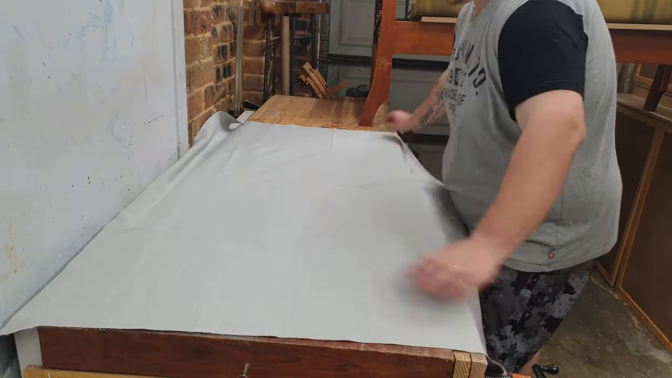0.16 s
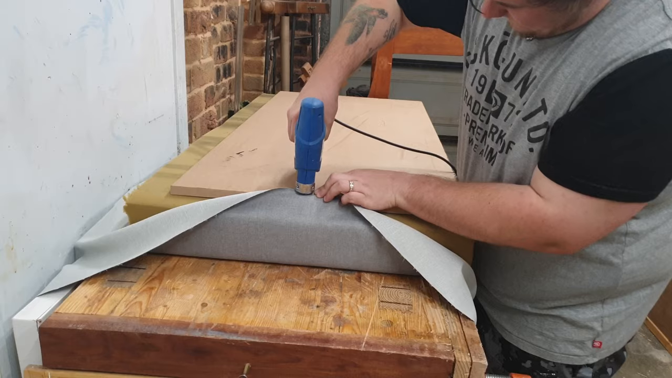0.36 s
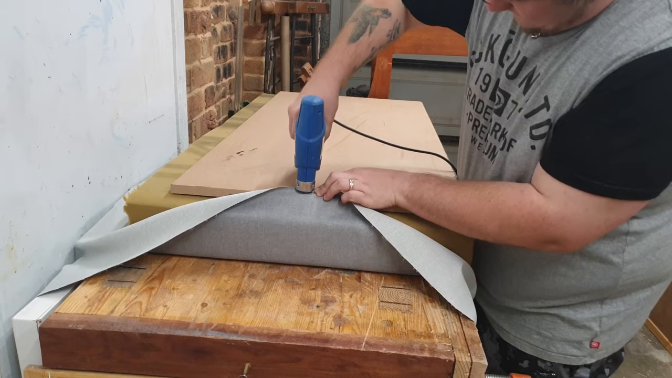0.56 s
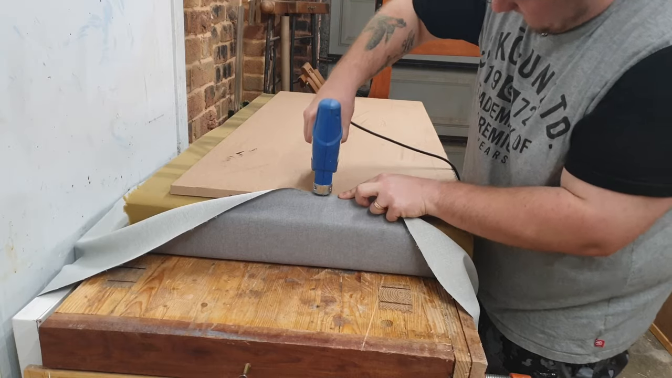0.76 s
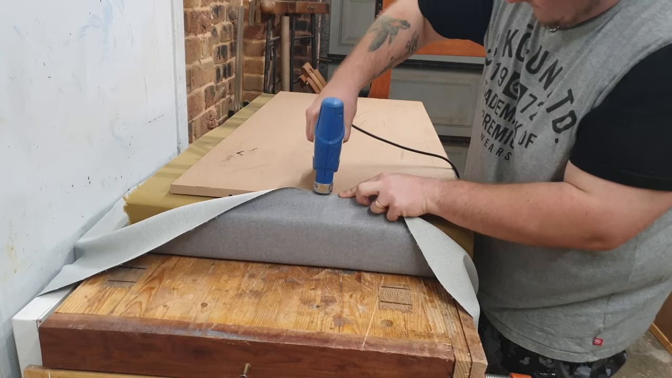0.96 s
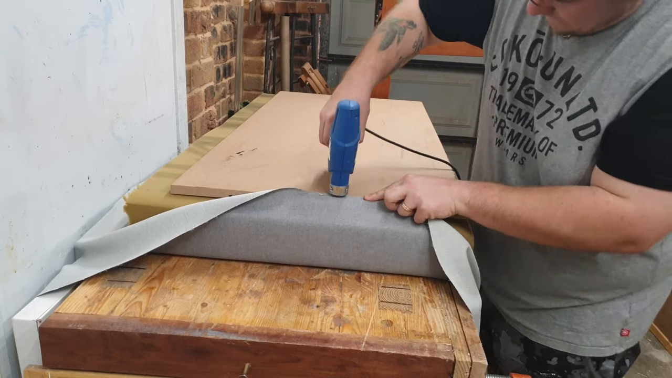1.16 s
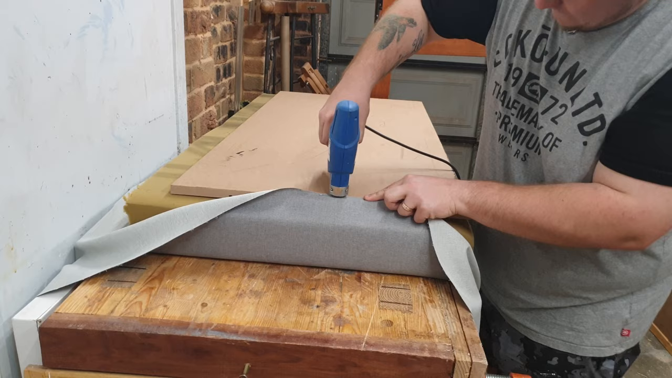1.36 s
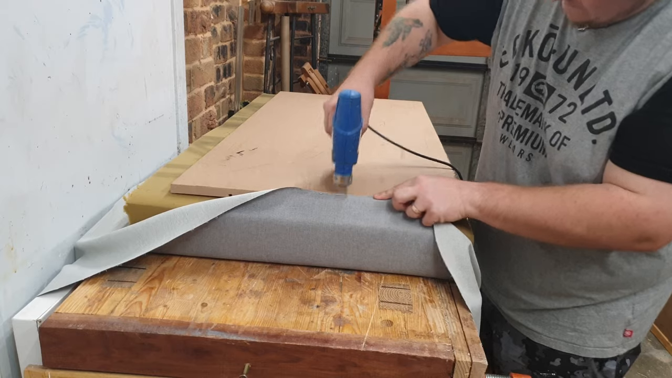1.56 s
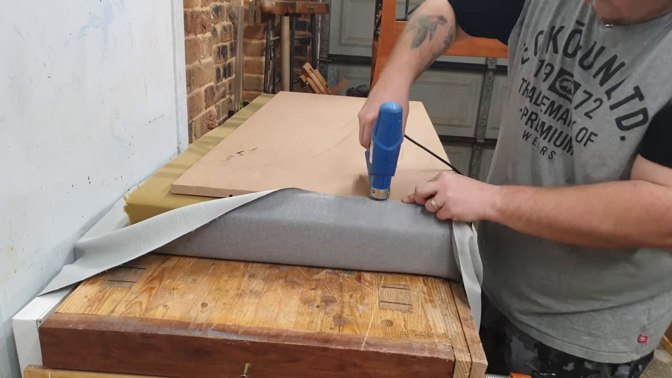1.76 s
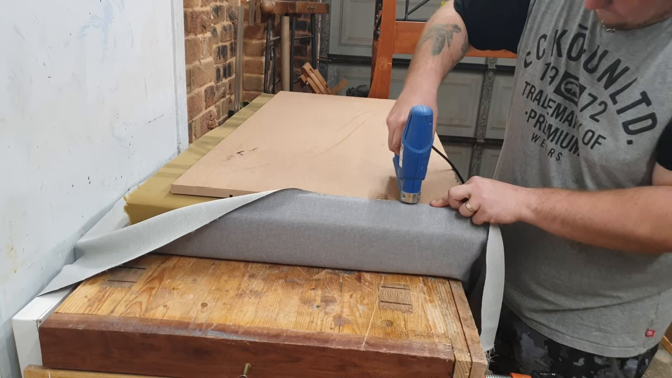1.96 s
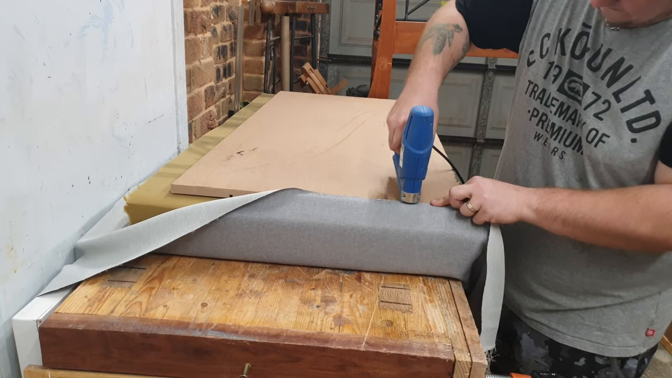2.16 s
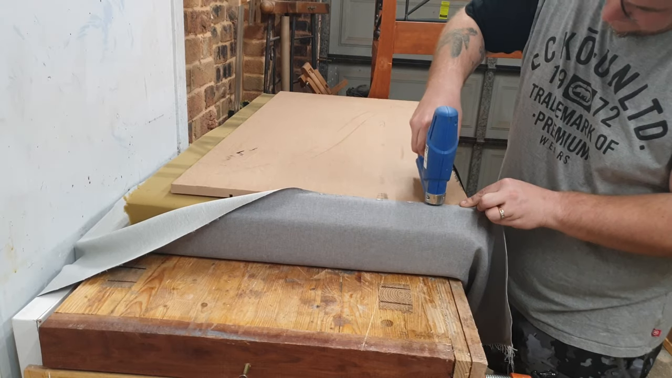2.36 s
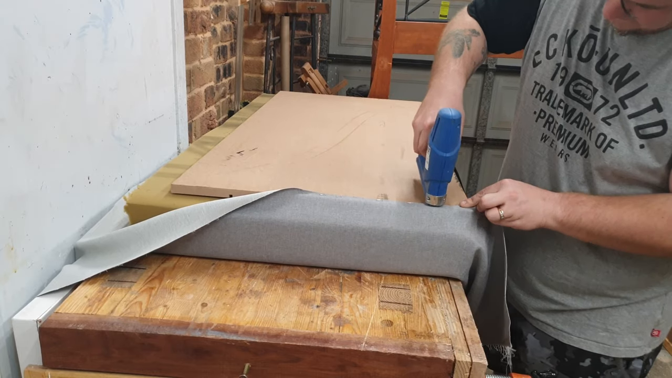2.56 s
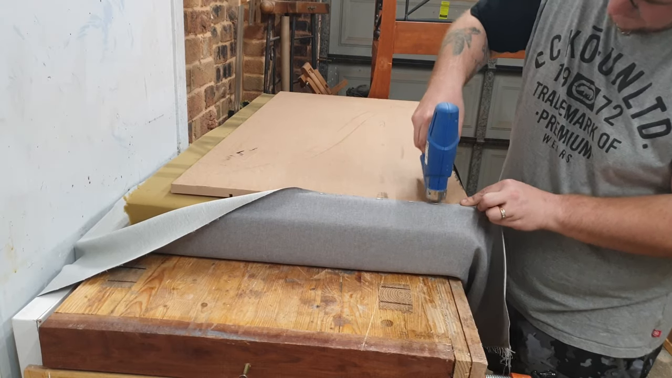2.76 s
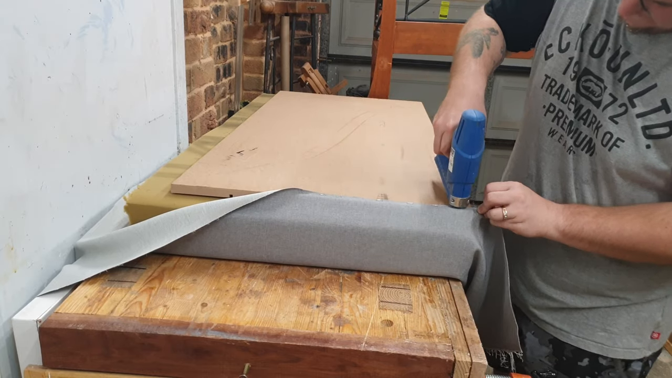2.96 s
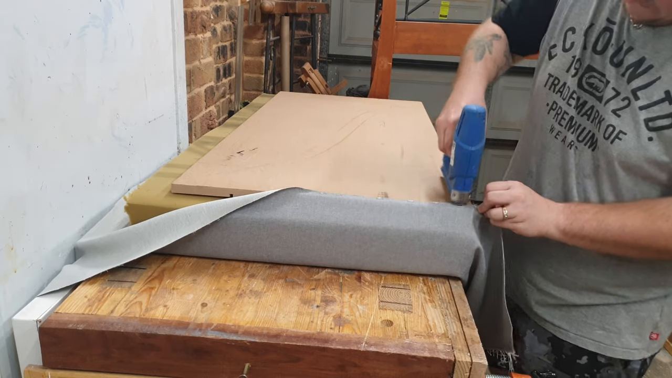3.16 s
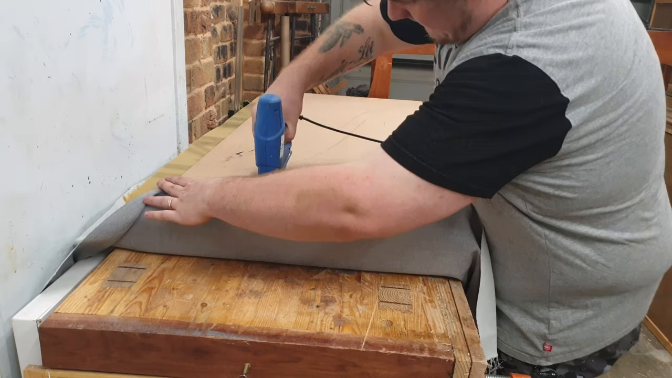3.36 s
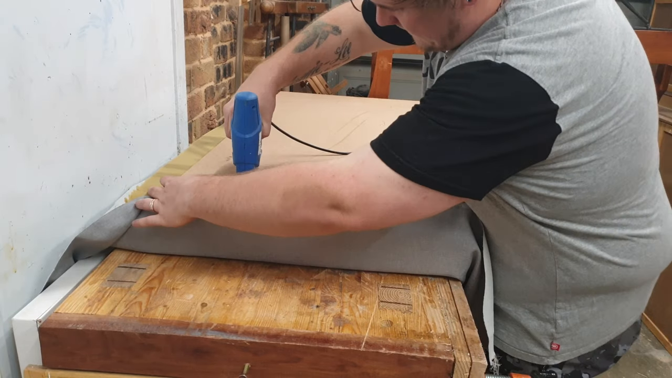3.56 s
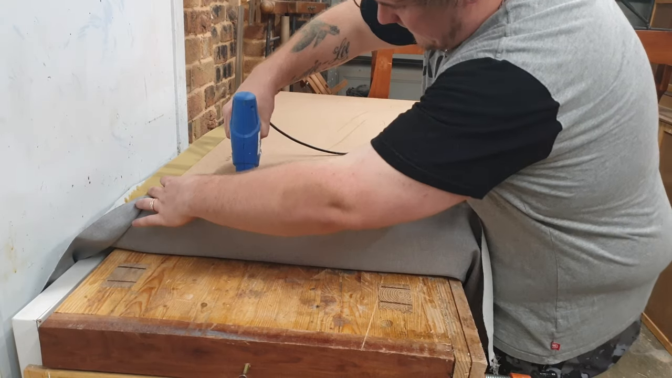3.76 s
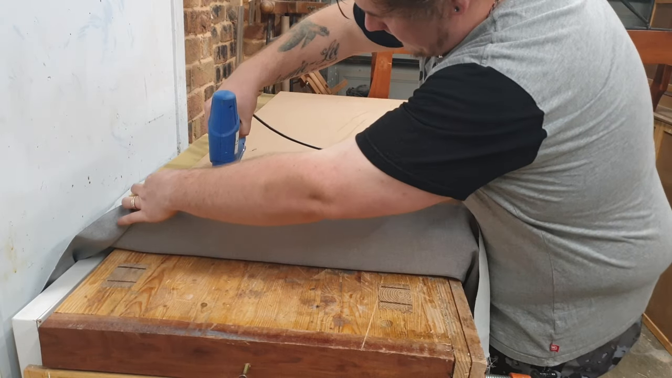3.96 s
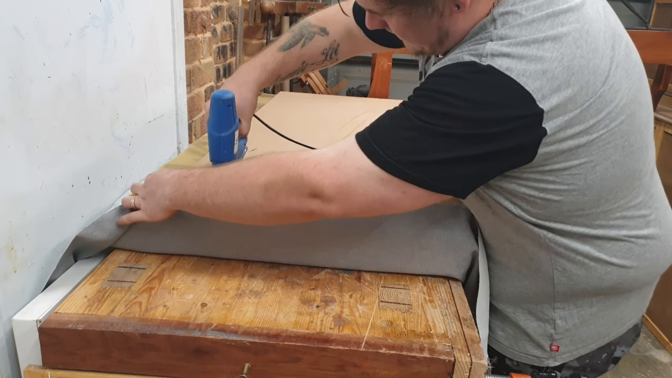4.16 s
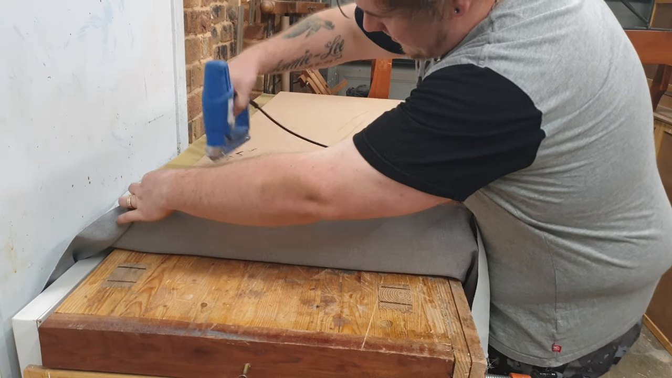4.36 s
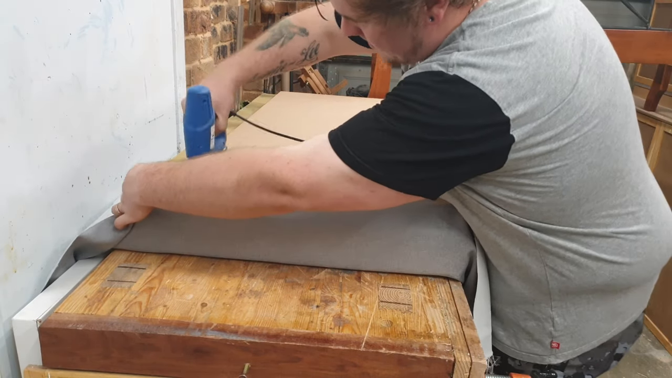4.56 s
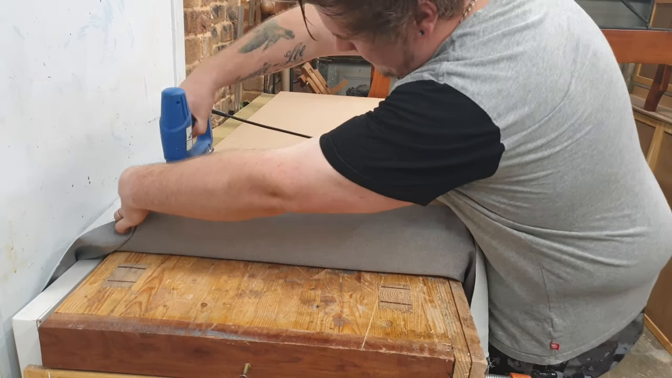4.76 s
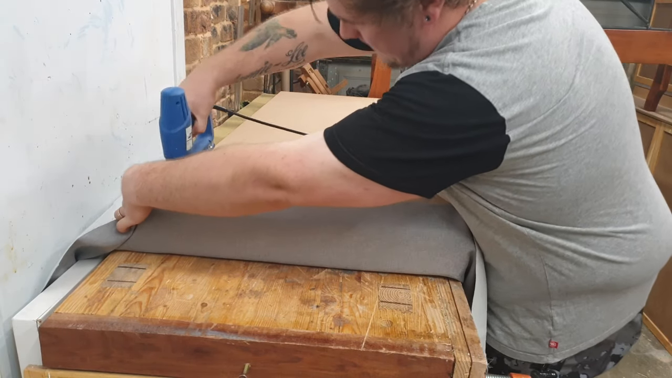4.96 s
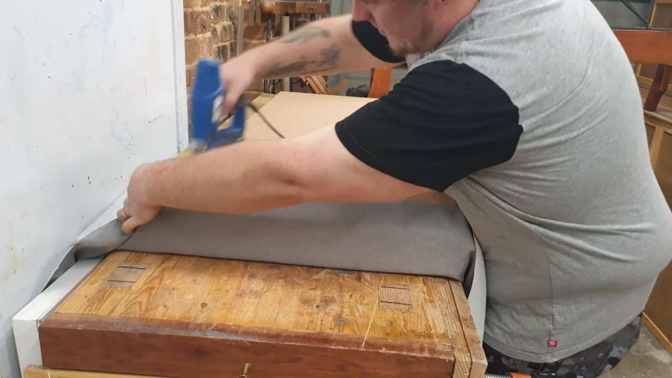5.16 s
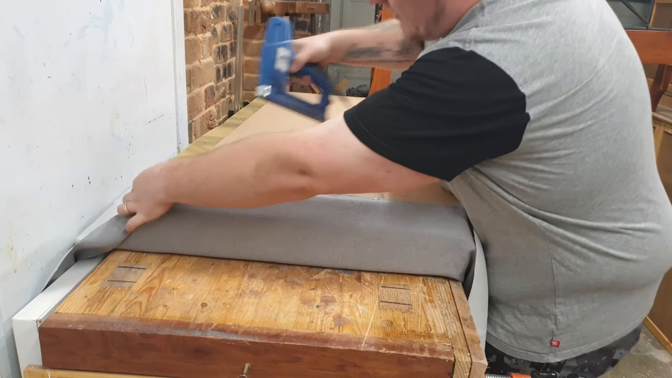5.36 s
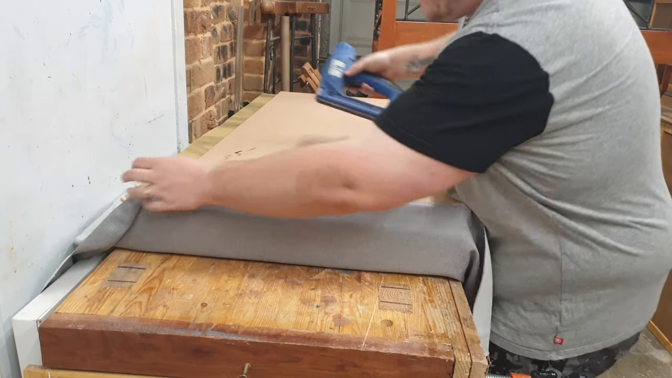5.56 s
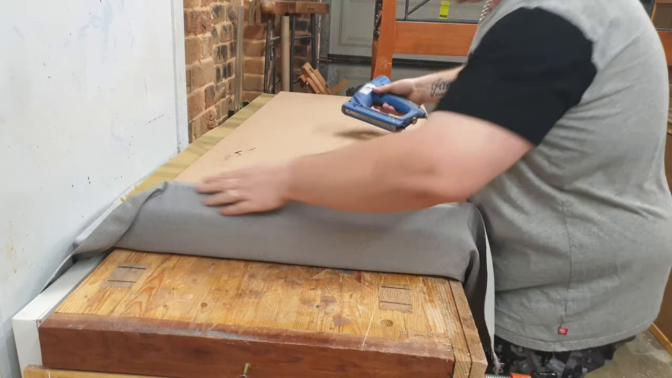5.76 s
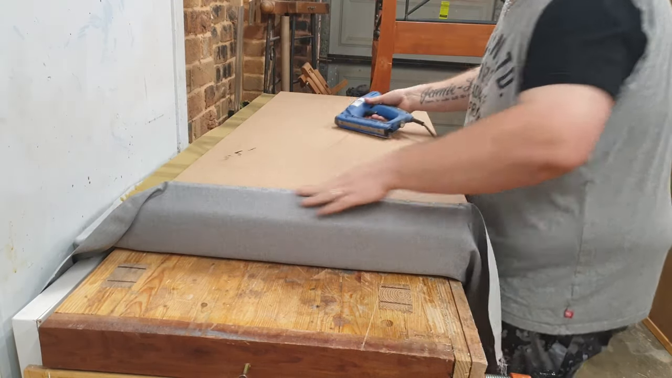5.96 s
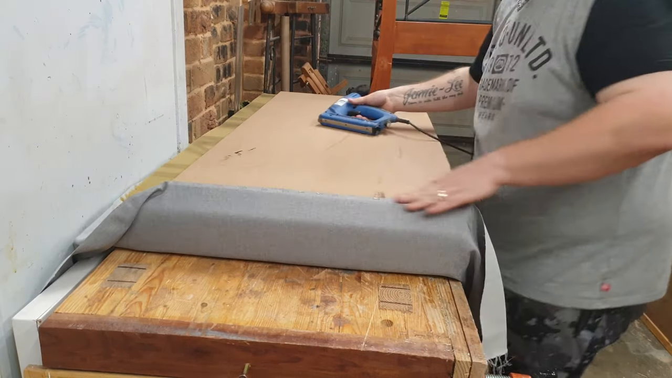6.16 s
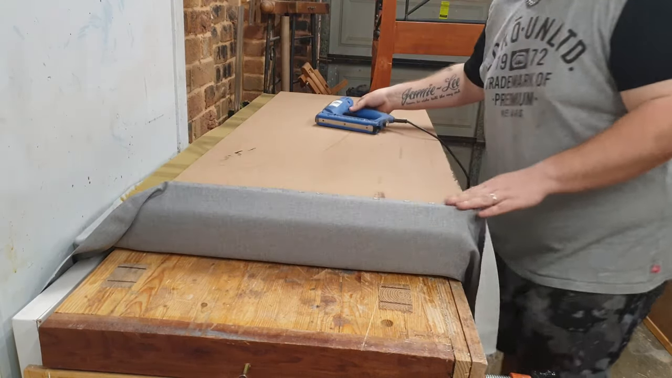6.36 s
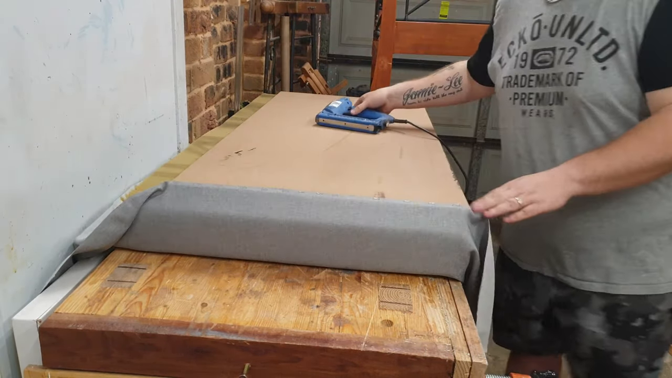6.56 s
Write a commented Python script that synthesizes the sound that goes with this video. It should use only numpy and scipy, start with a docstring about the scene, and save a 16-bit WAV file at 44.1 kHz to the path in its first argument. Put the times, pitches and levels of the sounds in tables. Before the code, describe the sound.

Twelve sharp electric staple gun shots crack through fabric into a padded board in a small garage, then the gun is set down and cloth patted.

```python
"""A low drone and faint room air come first, then twelve sharp shots of an electric staple gun.
It tacks fabric to a padded plywood board on a workbench in a small brick garage.
Each shot slams a steel driver home: steel clatters, the board thumps, the room answers.
Clatter is shaped noise; thumps and knocks are fading sine waves. The trigger clicks between shots.
At the end the gun is laid down and a hand pats and smooths the cloth."""
import sys
import numpy as np
from scipy import signal
from scipy.fft import rfft, irfft, next_fast_len
from scipy.io import wavfile
from scipy.ndimage import uniform_filter1d

SR = 44100
rng = np.random.default_rng(int(sys.argv[2]) if len(sys.argv) > 2 else 0)


def file_out(sig):
    """Save sig as 16-bit WAV at sys.argv[1]."""
    # one column per channel
    cols = np.atleast_2d(sig).T
    # limit, then scale
    lim = np.clip(cols, -1, 1)
    pcm = np.round(lim * 32767).astype(np.int16)
    wavfile.write(sys.argv[1], SR, pcm)


N = 291942
RING = 32768  # samples kept for each short sound
AGE = np.arange(RING) / SR  # seconds since a sound began
TIME = np.arange(N) / SR  # seconds since the start

# Staple shots, levels before the small trims in shot():
# t/s, clatter level/dB, thump level/dB, thump f/Hz, board knock level/dB, bench boom level/dB,
# driver travel/s (sets build-up and delays)
SHOTS = [(0.3524, -27, -39, 159, -28, -33.5, .0043), (0.803, -27, -36, 161, -29, -32, 0.0039),
         (1.3321, -27, -33.5, 160.6, -32, -36, 0.0043), (1.7283, -27, -38, 165, -30, -39, 0.0038),
         (2.071, -26.5, -38.5, 169, -35.5, -54.5, .0027), (2.5526, -27, -32.5, 174, -36.5, -42, 0.0041),
         (2.961, -27.5, -28, 176.8, -33.5, -36, 0.0046), (3.3725, -27.5, -42.5, 166.5, -31.5, -36, 0.0039),
         (3.694, -27, -41, 154.5, -33.5, -40.5, .0044), (4.0748, -28.5, -41, 172, -35, -50, .0063),
         (4.476, -31, -33.5, 177, -35, -44.5, 0.00049), (4.8568, -27.5, -31, 180.7, -32.5, -40.5, 0.0058)]
# Tone of the clatter, only the shape counts: f/Hz, level/dB
CLATTER_TONE = [(90, -30), (170, -3.5), (300, -1), (450, 0), (700, 0), (950, -2), (1200, -1.5),
                (1800, -1.5), (2400, -6.5), (3200, -11), (5000, -16), (9000, -53)]
# Tone of the steel sizzle, also used by click(): f/Hz, level/dB
SIZZLE_TONE = [(1500, -35), (3000, -3), (4500, 2), (6000, -0.5), (7100, 1.5), (8000, -6), (11000, -3),
               (15500, -4)]
# The plunger's own rattle is thin, as it has not reached the wood yet: f/Hz, level/dB
PLUNGER_TONE = [(200, -5.5), (500, -8.5), (1100, -0.5), (15000, 3.5)]
# Ringing of the plywood board before scatter and detuning: f/Hz, level/dB, t60/s
BOARD = [(181.5, -0.5, 0.23), (213.5, -3.5, 0.29), (237.7, 3, 0.14), (272, 1.5, 0.31), (294, 0, .33),
         (368, -3, 0.36), (414, -12, 0.41)]
# Deep ringing of bench and garage before scatter and detuning: f/Hz, level/dB, t60/s
DEEP = [(59, -3, 0.47), (84, -0.5, 0.35), (112.3, 1, 0.23), (133, 8, 0.31)]
SIZZLE_DB = -6.5  # sizzle against the shot's clatter level in the table


def shot(clatter_db, thump_db, thump_hz, knock_db, boom_db, travel_s, shade_db):
    """The plunger hits the driver, the staple bites a little later, and the board takes the blow."""
    gun = casing()
    sizzle = garage(0.87, 0.0097) + undb(-3.0) * contacts(0.00045, travel_s, 0.038, 3.4)
    plunger = undb(-5.5) * colour(contacts(0.00054, travel_s, 0.036, 2.3), PLUNGER_TONE)
    # the driver bottoms out in the wood
    bite = garage(0.89, 0.0045) + undb(-5.0) * contacts(0, 0.0022, 0.046, 3.0)
    clatter = plunger + late(bite, 1.8 * travel_s)
    steel = level(colour(sizzle, SIZZLE_TONE, gun), clatter_db + SIZZLE_DB + shade_db, size=4410)
    body = level(colour(clatter, CLATTER_TONE, gun), clatter_db + 1.32, size=4410)
    thump = level(modes([(thump_hz, 0, .22)], .005, 0, 0), thump_db + 1.8, size=4410)
    knock = level(modes(BOARD, 0.004, 2.0, .008), knock_db - .6, size=4410)
    # the heavy bench answers slowly and hums on
    boom = level(modes([(148.0, 0, 0.48)], 0.022, 0, 0.0075), boom_db - 0.2, size=4410)
    deep = level(modes(DEEP, .005, 2.0, .012), -40, size=4410)
    board_and_bench = late(thump + knock + boom + deep, 3 * travel_s)
    return steel + body + tail(clatter_db) + board_and_bench


# Steel and casing of the gun before scatter: f/Hz, width/Hz, level/dB above its broad tone
GUN = [(499, 6.7, 2.5), (637, 39, 6), (664, 60, 0), (772.4, 16, 6.5), (848, 20, 2), (1033, 21, 1),
       (1175, 64, 4), (1416, 7.3, 3), (1743, 9.3, 1.5), (2985, 44, 4), (3370, 14, 1), (4140, 45, 1),
       (4060, 20, -2), (4915, 70, 3), (6870, 45, -1.5)]


def casing(scatter_db=1.0, lump_db=2.5, count=60):
    """Grip and pressure favour other resonances on every blow; the hand keeps them damped."""
    grip = rng.standard_normal((len(GUN), 2))
    steel = []
    for (f, width, db), (louder, sharper) in zip(GUN, grip):
        steel.append((f * (1 + .004 * sharper), max(width, f / 75), db + scatter_db * louder))
    # the plywood's crowded upper modes depend on where the nose stands
    place = rng.standard_normal(count)
    upper_hz = np.geomspace(450, 10000, count)
    return steel + [(f, max(f / 45, 35), lump_db * a) for f, a in zip(upper_hz, place)]


def contacts(delay_s, rise_s, t60, spread_db):
    """Direct sound of parts rattling against each other: a short shower of unequal ticks."""
    ticks = irfft(diffuse(RING, alike_hz=1500)[1])
    sizes = undb(spread_db * np.repeat(rng.standard_normal(RING // 16), 16))
    burst = ticks * sizes * swell(rise_s) * fade(t60)
    return level(late(burst, delay_s), 0, size=4410)


def modes(table, rise_s, scatter_db, detune):
    """Fading sine waves; each blow weights and tunes them a little differently."""
    chance = rng.standard_normal((len(table), 3))
    out = 0
    for (f, db, t60), (louder, sharper, phase) in zip(table, chance):
        wave = np.sin(2 * np.pi * (f * (1 + detune * sharper) * AGE + phase))
        out = out + undb(db + scatter_db * louder) * wave * fade(t60)
    return out * swell(rise_s)


# How long the garage rings, before each sound's stretch: f/Hz, t60/s
GARAGE = [(100, 0.69), (300, 0.37), (800, 0.36), (2000, 0.36), (5000, 0.32), (9000, 0.32), (15000, 0.26)]


def garage(stretch, rise_s, far_s=0.02, far_db=-8):
    """Dense reflections build up quickly, swell when the far wall answers, die sooner in the treble."""
    hz, field = diffuse(RING)
    out = 0
    for k, (f, t60) in enumerate(GARAGE):
        # this band's share of the noise, blending into its neighbours
        share = lookup([(g[0], j == k) for j, g in enumerate(GARAGE)], hz)
        out = out + irfft(field * share) * fade(t60 * stretch)
    far_wall = undb(far_db) * (1 - np.exp(-(AGE / far_s) ** 6))
    return level(out * swell(rise_s) * (1 + far_wall), 0, size=4410)


# Tone of the late echo, only the shape counts: f/Hz, level/dB
TAIL_TONE = [(60, -4.5), (150, -3.5), (500, -2.5), (1000, -0.5), (2300, -1.5), (3500, -8), (6500, -12),
             (8500, -19.5), (15000, -22)]
# level against the clatter before build-up and fade, build-up time, ringing time
TAIL_DB, TAIL_RISE_S, TAIL_T60_S = -13, 0.21, 0.73


def tail(clatter_db):
    """The far end of the garage rings on: a slow swell that outlasts the near reflections."""
    echo = level(colour(irfft(diffuse(RING)[1]), TAIL_TONE), clatter_db + TAIL_DB, size=RING)
    return echo * swell(TAIL_RISE_S) * fade(TAIL_T60_S)


# The trigger's switch ticks just before some shots: t/s, treble level/dB before click()'s trim
PULLS = [(.782, -54.5), (1.316, -53.5), (2.54, -51), (3.356, -55.5), (4.057, -60), (4.844, -53)]
PULL_BODY_DB = -7  # body against treble, before the trims


def pull(db):
    """The trigger closes its switch with a thin tick."""
    return click(db + PULL_BODY_DB, db)


# The trigger springs back about .22 s after a shot: t/s, body level/dB before click()'s trim
RELEASES = [(.5707, -65), (1.0207, -63), (2.3, -65.5), (2.7655, -50.5), (3.156, -58), (3.618, -55),
            (3.9445, -41.5), (4.3095, -42), (4.665, -55.5), (5.072, -48.5)]
# treble at a reference body level, and dB of treble per dB of body (before the trims)
RELEASE_TREBLE_DB, RELEASE_BODY_DB, RELEASE_SLOPE = -54, -51.5, 0.72


def release(db):
    """The trigger springs back; a harder snap gains more body than treble."""
    return click(db, RELEASE_TREBLE_DB + RELEASE_SLOPE * (db - RELEASE_BODY_DB))


# Clicks of trigger, nose and gun:
# t/s, body level/dB, treble level/dB (both before the trims in click())
CLICKS = [(.31, -63.5, -63.5), (1.2796, -60.5, -64), (2.0445, -43, -47), (2.479, -62.5, -65.5),
          (2.935, -53, -53.5), (5.181, -56.5, -66), (6.033, -60.5, -69), (6.104, -39, -49),
          (6.408, -67.5, -82)]
# Tone of a click's body, only the shape counts: f/Hz, level/dB
CLICK_TONE = [(150, -15.5), (450, -12.5), (750, -7), (1200, -0.5), (2000, 1), (2800, -2), (4000, -6.5),
              (6000, -12.5), (9000, -49.5)]


def click(body_db, treble_db):
    """A light snap of plastic or spring steel, a rebound 3 ms later, and their echo."""
    crack = contacts(0, .0002, .011, 4.0) + undb(-5) * contacts(.003, .0002, .011, 4.0)
    body = colour(garage(1.08, .004, far_db=-14) + undb(-2.5) * crack, CLICK_TONE, casing())
    steel = colour(garage(1.0, .004, far_db=-14) + undb(-.5) * crack, SIZZLE_TONE)
    return level(body, body_db + 1.64, size=882) + level(steel, treble_db + 2.1, size=882)


# The gun's steel nose scrapes to its next place: t/s, length/s, level/dB before the stroke's shape
SCRAPES = [(1.5, 0.14, -58.5), (3.27, 0.3, -48), (3.647, 0.17, -47), (4.36, 0.084, -63)]
# Tone of a scrape, only the shape counts: f/Hz, level/dB
SCRAPE_TONE = [(400, -23.5), (1200, -8.5), (2300, -5), (3200, 3), (4200, -0.5), (5200, -10.5), (6500, -11),
               (8500, -14.5), (15000, -20)]


def scrape(length_s, db):
    """Steel catches and slips on the weave in a quick run of tiny ticks."""
    stroke = np.sin(np.pi * np.clip(AGE / length_s, 0, 1)) ** .5
    sizes = undb(2.0 * np.repeat(rng.standard_normal(RING // 64), 64))
    ticks = irfft(diffuse(RING)[1]) * sizes
    return level(colour(ticks, SCRAPE_TONE), db, size=RING) * stroke


# Dull knocks on wood: t/s, level/dB before the trim in wood()
KNOCKS = [(.193, -89), (.629, -43), (3.24, -57.5), (5.518, -64.5)]
# Tone of a knock, only the shape counts: f/Hz, level/dB
WOOD_TONE = [(120, -7), (300, 3), (1000, 4), (1900, 3.5), (2400, -5), (3000, -12.5), (5000, -26),
             (12000, -30)]


def wood(db):
    """A hard edge meets the cloth-covered board: the fabric swallows the treble."""
    tap = garage(0.81, 0.0038) + undb(-10.5) * contacts(0, .002, .03, 2.2)
    return level(colour(tap, WOOD_TONE), db + 0.32, size=1323)


# Soft bumps of hand and gun on the board: t/s, level/dB before the trims in bump()
BUMPS = [(6.031, -40), (6.215, -47.5), (6.262, -50.5), (6.343, -54.5), (6.407, -47.5)]
# Tone of a bump, only the shape counts: f/Hz, level/dB
BUMP_TONE = [(60, -13.5), (120, -14.5), (165, 7), (260, -6), (400, -9), (700, -14.5), (2000, -35.5),
             (6000, -45), (15000, -38)]


def bump(db):
    """A padded blow wakes only the low range of the board."""
    push = garage(.8, .004, far_db=-14) + undb(-3) * contacts(0, .001, .06, 1.5)
    ring = modes([(162.5, -0.5, 0.27), (245, -1, 0.26), (283, -5, 0.23)], .003, 1.0, 0.018)
    return level(colour(push, BUMP_TONE), db - 4.5, size=1764) + level(ring, db - 6.5, size=1764)


# Soft swells of hiss, most of them a hand on cloth:
# t/s, length/s, peak level/dB before the uneven grain
HISS_SWELLS = [(.18, 0.089, -77.5), (1.017, .16, -62), (3.758, 0.37, -58), (4.564, 0.19, -55.5),
               (5.197, 0.22, -73), (5.506, 0.18, -76.5), (5.726, .12, -77), (6.214, 0.18, -73)]
# Tone of the cloth, only the shape counts: f/Hz, level/dB
CLOTH_TONE = [(150, -3), (500, -2.5), (1000, -1), (2300, 1), (3500, -7), (6500, -10.5), (8500, -21.5),
              (15000, -24)]
RUSTLE_DB = -79.5  # faint rustle of cloth and clothing under the swells, before the uneven grain


def cloth(grain_db=3.0, slips_per_s=80):
    """Fabric drags in small uneven slips: hiss with a flickering level that swells and fades."""
    strength = undb(RUSTLE_DB)
    for s, length_s, db in HISS_SWELLS:
        strength = strength + undb(db) * np.sin(np.pi * np.clip((TIME - s) / length_s, 0, 1))
    hiss = level(colour(irfft(diffuse(N)[1]), CLOTH_TONE), 0, size=N)
    return hiss * strength * undb(grain_db * walk(slips_per_s))


# The drone drops in pitch early, swells and ebbs, and finally fades:
# t/s, f/Hz before its wander, level/dB
DRONE = [(0, 87.3, -71.5), (.25, 87.6, -56.5), (.55, 63.6, -59.5), (1.121, 60.5, -66.5),
         (1.35, 60.8, -57.5), (2.7, 60, -58.5), (3.3, 60, -69.5), (5.1, 59, -63), (5.6, 59, -77.5)]
# Tone of the rumble around the drone, only the shape counts: f/Hz, level/dB
RUMBLE_TONE = [(36, -27), (55, 2), (90, -4.5), (130, -9.5), (300, -19), (700, -26), (1500, -52.5)]
# Tone of the still room air, only the shape counts: f/Hz, level/dB
AIR_TONE = [(25, -8.5), (60, 6.5), (100, 1), (200, -10.5), (500, -22), (2000, -25.5), (6000, -19),
            (15000, -22.5)]
DRONE_WANDER, DRONE_WANDER_PER_S = 0.026, 2  # scale as a share of the pitch, new values per second


def background(waver=.2, rumble_db=-4, air_db=-82):
    """A low drone wanders in pitch and rumbles over still room air."""
    s, hz, db = np.transpose(DRONE)
    pitch = np.interp(TIME, s, hz) * (1 + DRONE_WANDER * walk(DRONE_WANDER_PER_S))
    hum = np.sin(2 * np.pi * np.cumsum(pitch) / SR + waver * walk(30))
    rumble = level(colour(irfft(diffuse(N)[1]), RUMBLE_TONE), rumble_db, size=N)
    drone = (hum + rumble) * undb(np.interp(TIME, s, db))
    air = level(colour(irfft(diffuse(N)[1]), AIR_TONE), air_db, size=N)
    return drone + air


def undb(db):
    """Turn decibels into gain."""
    return 10 ** (np.asarray(db) / 20)


def lookup(points, hz):
    """Read (f/Hz, value) points on a log-frequency axis."""
    f, value = np.transpose(points)
    return np.interp(np.log(hz + 1), np.log(f), value)


def fade(t60):
    """Free decay after a blow: 60 dB down after t60 seconds."""
    return np.exp(-np.log(1000) * AGE / max(t60, .002))


def swell(rise_s):
    """Smooth build-up after a blow."""
    return 1 - np.exp(-(AGE / max(rise_s, 1e-4)) ** 2)


def level(x, db, size):
    """Set the average strength (rms) of the first size samples."""
    return x * undb(db) / np.sqrt(np.mean(x[..., :size] ** 2))


def late(x, delay_s):
    """Delay a sound that has died away by its end."""
    return np.roll(x, int(max(delay_s, 0) * SR), axis=-1)


def walk(rate):
    """Slow chance: random values held for 1 / rate seconds, with smooth slides between them."""
    hold = int(SR / rate)
    steps = np.repeat(rng.standard_normal(N // hold + 1), hold)
    return uniform_filter1d(steps, hold)[:N]


def colour(x, points, peaks=()):
    """Filter with a broad tone and resonances on top, with no sound ahead of the blow."""
    n = next_fast_len(x.shape[-1] + 4096) // 2 * 2
    hz = np.arange(n // 2 + 1) * SR / n
    db = lookup(points, hz) + sum(d / (1 + (2 * (hz - f) / w) ** 2) for f, w, d in peaks)
    # folding the cepstrum makes the filter respond only after its input (minimum phase)
    cepstrum = irfft(db * np.log(10) / 20)
    cepstrum[1:n // 2] *= 2
    cepstrum[n // 2 + 1:] = 0
    return irfft(rfft(x, n) * np.exp(rfft(cepstrum)), n)[..., :x.shape[-1]]


def diffuse(size, alike_hz=580):
    """Noise from all around at two microphones: alike in the bass, unrelated in the treble."""
    hz = np.arange(size // 2 + 1) * SR / size
    alike = .97 / (1 + (hz / alike_hz) ** 3)
    mid, side = rfft(rng.standard_normal((2, size)))
    return hz, mid * np.sqrt(1 + alike) + side * np.sqrt(1 - alike) * np.array([[1], [-1]])


# Moments at which the ringing drops: t/s
BREAKS = [1.689, 2.445, 2.913, 3.279, 3.646, 4.011]
BREAK_DB_PER_S, BREAK_DB = 3000, 15  # how fast and how far it drops


def add(out, s, sound):
    """Mix a sound in at time s; at the next break its level drops abruptly."""
    start = int(s * SR)
    stop = min([b for b in BREAKS if b > s], default=N / SR)
    drop_db = np.clip((s + AGE - stop) * BREAK_DB_PER_S, 0, BREAK_DB)
    sound = sound * undb(-drop_db)
    out[:, start:start + RING] += sound[..., :N - start]


SHADE_FROM_S, SHADE_DB = 3.1, -1.6  # the free arm reaches across and shades the sizzle


def scene():
    """Shots with their trigger clicks, and handling noises between them, over cloth and room air."""
    out = cloth() + background()
    for s, *blow in SHOTS:
        add(out, s, shot(*blow, shade_db=SHADE_DB * (s > SHADE_FROM_S)))
    handling = ((PULLS, pull), (RELEASES, release), (CLICKS, click),
                (SCRAPES, scrape), (KNOCKS, wood), (BUMPS, bump))
    for table, source in handling:
        for s, *row in table:
            add(out, s, source(*row))
    return out


# Left side minus right side: f/Hz, level/dB
PAN = [(80, 3), (250, 1), (900, -2), (2000, -1.5), (4500, -4.5), (7000, -7.5), (8500, 2.5), (12000, -0.5)]
TOP_HZ = 15800  # the treble is cut above this


def record(dry):
    """Each microphone has its own colour; the highest peaks are rounded and the top is cut steeply."""
    sides = [colour(x, [(f, side * db / 2) for f, db in PAN]) for x, side in zip(dry, (1, -1))]
    ports = np.array(sides)
    rounded = ports / (1 + (ports / .36) ** 4) ** .25
    return signal.sosfilt(signal.ellip(10, .2, 80, TOP_HZ, fs=SR, output="sos"), rounded)


dry = scene()
out = record(dry)
file_out(out)
```